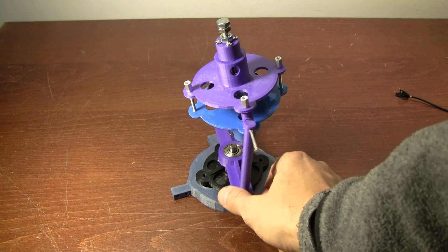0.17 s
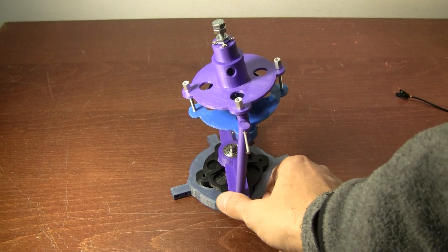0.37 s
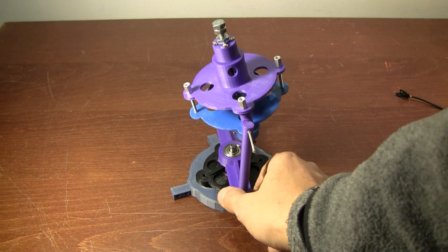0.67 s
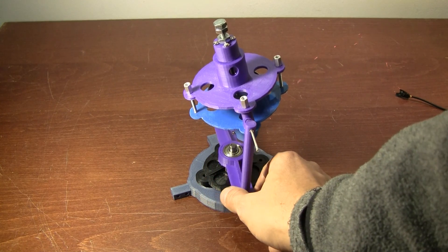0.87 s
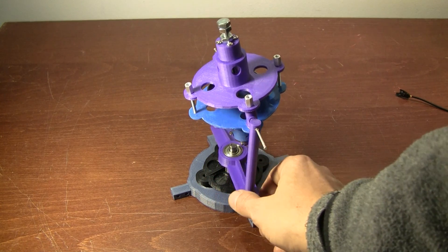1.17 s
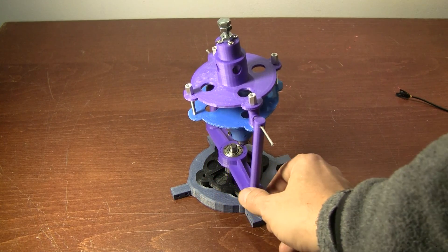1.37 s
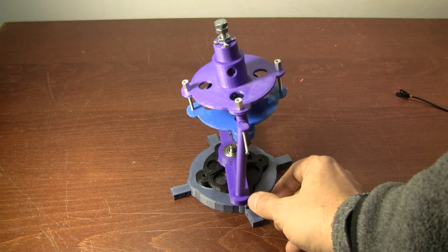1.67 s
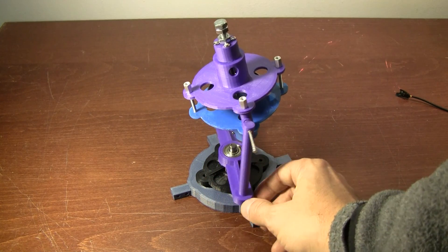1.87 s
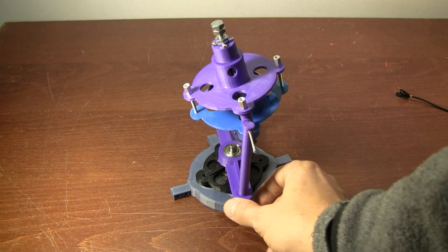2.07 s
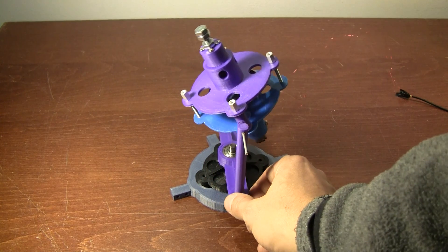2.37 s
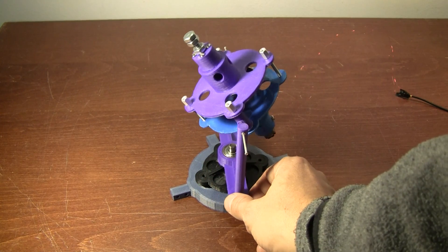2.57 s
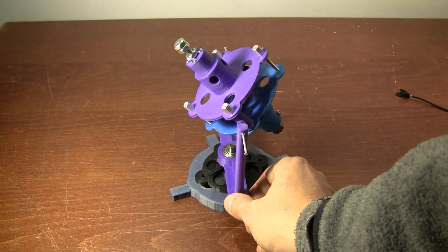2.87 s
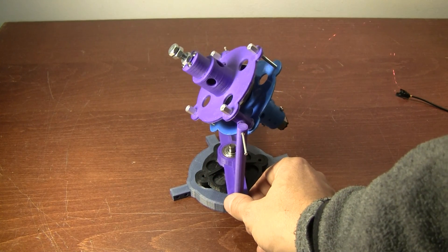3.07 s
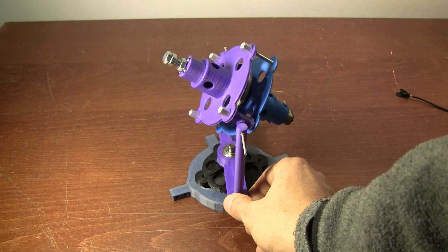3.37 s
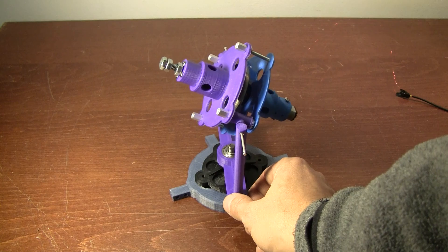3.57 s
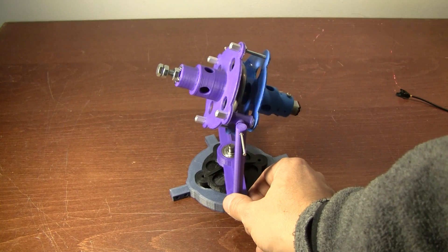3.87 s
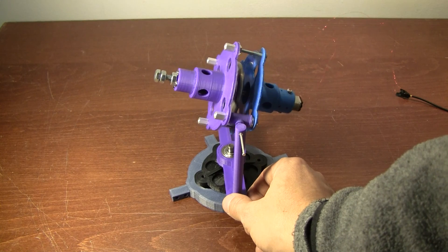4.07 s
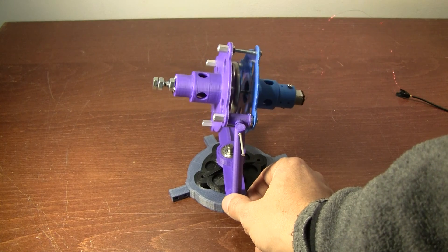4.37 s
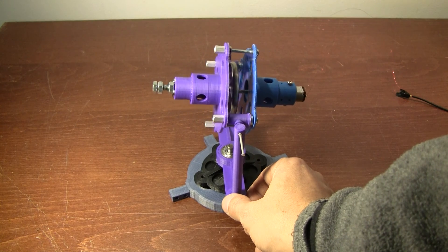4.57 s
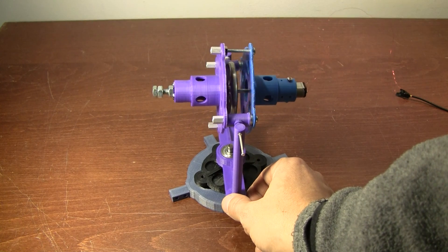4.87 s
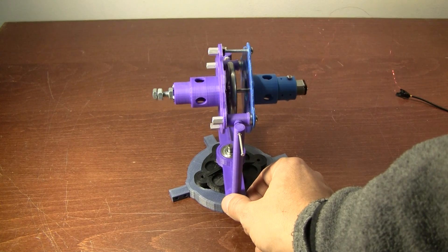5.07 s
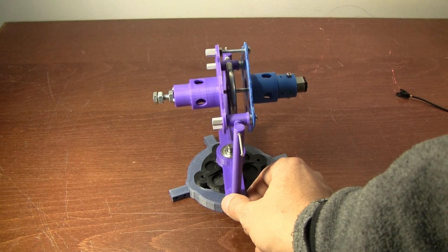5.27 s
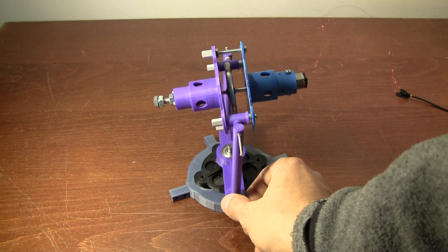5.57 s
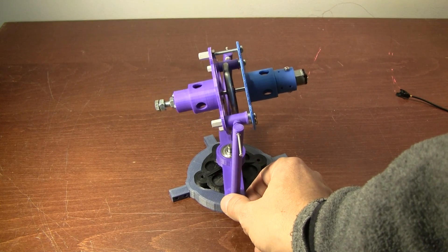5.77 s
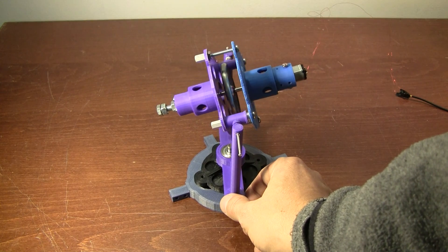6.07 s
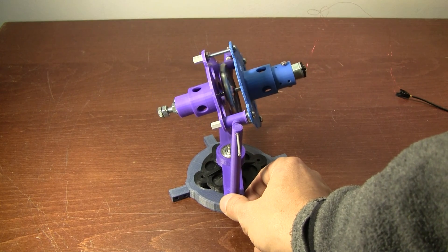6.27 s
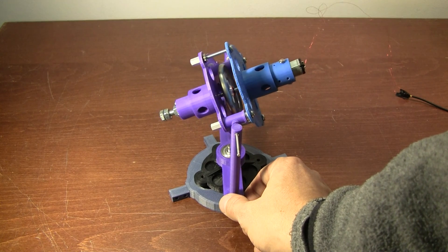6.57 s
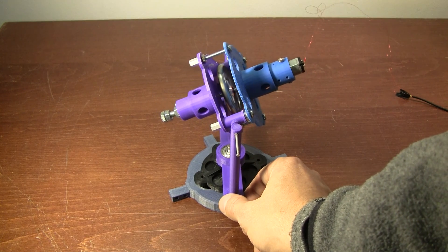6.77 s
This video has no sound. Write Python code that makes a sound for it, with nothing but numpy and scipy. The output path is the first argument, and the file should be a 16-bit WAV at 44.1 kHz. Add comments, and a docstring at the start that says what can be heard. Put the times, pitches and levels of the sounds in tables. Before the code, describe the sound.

A motor-driven gyroscope whirrs at constant speed on a wooden table, close to a stereo microphone. Dense, bright bearing rush covers fluttering whines and a low hum. The hum dips four times as the base turns, then jumps when the frame tips. The rush thins, whines become steadier, and a faint high hiss slides downward late on.

```python
"""A motor-driven gyroscope spins at constant speed in a plastic gimbal on a wooden table.
At first it is nearly upright: its ball bearings rush, shaped by the resonances of the frame, its unbalance hums,
and whining tones at multiples of the rotor speed, with cage sidebands, swell, some alone, some together.
The hum dips in an even run while the base is turned; then a hand tilts the frame, and rush and whine change colour.
Past the horizontal a thin hiss slides down in pitch, and the rotor whirls briefly in low tones."""
import sys
import numpy as np
from scipy import signal
from scipy.fft import rfft, irfft
from scipy.io import wavfile

SR = 44100
rng = np.random.default_rng(int(sys.argv[2]) if len(sys.argv) > 2 else 0)


def master_out(mix):
    """Clip the mix to full scale and print it as 16-bit PCM to the path in sys.argv[1]."""
    frames = np.transpose(np.atleast_2d(mix))
    ceiling = np.clip(frames, -1, 1)
    pcm = np.round(ceiling * 32767).astype(np.int16)
    wavfile.write(sys.argv[1], SR, pcm)


N = 305613
CONTROL_STEP = 100  # samples between two values of a slow control
ROTOR_HZ, CAGE_HZ = 311.38, 119.93  # turns per second of the rotor and of the cage that holds the balls

# how alike the left and right sides are: f/Hz, likeness (1 = the same on both sides)
LIKENESS = [(60, .7), (130, 0.53), (290, 0.9), (640, 0.85), (1400, 1), (3100, 1), (5500, 1), (7000, 0.83),
            (10000, 0.52), (15000, .55)]


def from_db(db):
    """Turn decibels into a factor for the amplitude."""
    return 10 ** (np.asarray(db) / 20)


def rms_one(x):
    """Scale a signal to an rms of 1."""
    return x / np.sqrt(np.mean(x ** 2) + 1e-20)


def seconds():
    """Time of every sample."""
    return np.arange(N) / SR


def ticks():
    """Times of the slow controls."""
    return np.arange(N // CONTROL_STEP + 2) * CONTROL_STEP / SR


def per_sample(control):
    """Fill in a slow control, sample by sample."""
    return np.interp(seconds(), ticks(), control)


def bin_hz():
    """Frequency of every bin of the spectrum, at least 1 Hz so that its logarithm exists."""
    return np.maximum(np.arange(N // 2 + 1) * SR / N, 1)


def in_time(rows):
    """Turn each column of a table over time into a slow control."""
    times, *columns = np.transpose(rows)
    return [np.interp(ticks(), times, column) for column in columns]


def at_hz(points, hz):
    """Read each column of a spectrum table on a log-frequency axis."""
    table_hz, *columns = np.transpose(points)
    return np.array([np.interp(np.log(hz), np.log(table_hz), column) for column in columns])


def drift(rate):
    """Slow random control with an rms of 1: noise smoothed by two equal poles at the rate in Hz."""
    pole = np.exp(-2 * np.pi * rate * CONTROL_STEP / SR)
    settling = 2000  # values dropped while the filter settles
    noise = rng.standard_normal(len(ticks()) + settling)
    return rms_one(signal.lfilter([1], [1, -2 * pole, pole * pole], noise)[settling:])


def skidding(share, rate):
    """Complex strength of a tone, mean power 1: a steady part and a part that flutters in level and phase."""
    share = np.clip(share, 0, 1)
    flutter = drift(rate) + 1j * drift(rate)
    return np.sqrt(1 - share) + np.sqrt(share / 2) * flutter


def sides(hz):
    """Left and right gains of the microphone pair, with their mean power kept at 1."""
    # f/Hz, left minus right level/dB
    balance = [(100, -1.5), (380, 2.6), (700, 2.5), (1300, .5), (4400, 0.1), (8100, 0.5), (10000, -3),
               (12500, 5.5), (15000, 1.5)]
    pair = from_db(at_hz(balance, np.atleast_1d(hz)) * [[.5], [-.5]])
    return pair / np.sqrt(np.mean(pair ** 2, axis=0))


def partial(hz, strength):
    """A tone whose complex strength sets its rms and phase; where the sides are less alike, their phases part."""
    wave = per_sample(strength) * np.exp(2j * np.pi * (hz * seconds() + rng.random()))
    alike = np.clip(at_hz(LIKENESS, hz)[0], 0, 1)
    shared = np.sqrt(1 + alike) * wave.imag
    opposed = np.sqrt(1 - alike) * wave.real * [[1], [-1]]
    return sides(hz) * (shared + opposed)


def reflections(echo_db, t60):
    """Direct sound plus a short tail from table and wall: a fine ripple over the spectrum, mean power 1."""
    # the tail falls by 60 dB in t60 seconds, down to a floor at -120 dB
    tail = rng.standard_normal(N) * from_db(-60 * np.minimum(seconds() / t60, 2))
    response = 1 + from_db(echo_db) * rfft(tail) / np.linalg.norm(tail)
    return response / np.sqrt(1 + from_db(echo_db) ** 2)


def sliding_hiss():
    """As the frame passes the horizontal, a narrow band of bearing hiss swells, slides down and fades."""
    start_s, length_s, peak_db = 4.6, 2.8, -46
    start_hz, sag_hz_per_s, half_width_hz = 13050, 400, 160
    age = seconds() - start_s
    swell = np.sin(np.pi * np.clip(age / length_s, 0, 1))
    carrier = np.exp(2j * np.pi * np.cumsum(start_hz - sag_hz_per_s * age) / SR)
    lowpass = signal.butter(2, half_width_hz, fs=SR, output="sos")
    blur = signal.sosfilt(lowpass, rng.standard_normal((2, N)))
    # slow noise times the carrier gives a noise band around the sliding pitch
    band = rms_one(((blur[0] + 1j * blur[1]) * carrier).real)
    return from_db(peak_db) * swell * sides(start_hz) * band


def whirl(unrest):
    """In its bearing play the shaft orbits just under half speed; mixed with the rotation: two pairs of low tones."""
    # t/s, lower pair level/dB, upper pair level/dB
    whirl_levels = [(5.39, -85, -85), (5.46, -53, -62), (5.58, -55, -61), (5.7, -56, -52), (5.92, -58, -58),
                    (6.05, -83, -85)]
    orbit_hz = 142.3
    out = 0
    for hz in (orbit_hz, ROTOR_HZ - orbit_hz):
        # the upper pair lies one rotor frequency above the lower pair
        for turns, level_db in enumerate(in_time(whirl_levels)):
            strength = from_db(level_db) * skidding(unrest, rate=6)
            out = out + partial(hz + turns * ROTOR_HZ, strength)
    return out


def hum_dips(count):
    """While the base is turned, the hum dips in an even run, each dip shallower than the last (in dB)."""
    first_s, every_s, length_s = 1.64, 0.176, 0.047  # middle of the first dip, spacing, length
    first_db, kept_share = -16, 0.73
    dips = 0
    for k in range(count):
        since_middle = ticks() - first_s - k * every_s
        dips = dips + first_db * kept_share ** k * np.exp(-(2 * since_middle / length_s) ** 2)
    return dips


def hum(waver_db, waver_rate):
    """The unbalance shakes the table once a turn; its hum wavers slightly in level."""
    # jumps as the frame starts to tip, eases as it lies down: t/s, level before waver and dips/dB
    unbalance = [(0.06, -47), (2.27, -49), (2.33, -41), (3.18, -39), (5.6, -46.5), (5.62, -49.5),
                 (6.9, -49.5)]
    level_db, = in_time(unbalance)
    waver = waver_db * from_db(level_db.min() - level_db) * drift(waver_rate)
    return partial(ROTOR_HZ, from_db(level_db + waver + hum_dips(count=4)))


def sung_power(rotor, cage):
    """Power that one tone gains when it sings out in the frame: each swell rises, holds and fades."""
    # start t/s, length/s, rotor multiple, cage multiple, level before trim/dB
    singing = [(0.65, 1.64, 12, 0, -34.5), (0.9, 0.7, 30, 0, -39), (1.3, 2.1, 17, 0, -44.5),
               (2.24, 0.46, 34, 0, -37), (2.24, 0.33, 33, 0, -38), (2.24, 0.38, 39, 0, -45),
               (2.28, 0.28, 13, 0, -36.5), (2.32, 0.3, 15, 1, -35.5), (2.35, 1.5, 41, 0, -39.5),
               (2.676, 0.82, 5, 0, -42), (3.0, 3.06, 15, 1, -39), (3.55, 1.1, 34, 0, -43),
               (3.55, 1.2, 31, 0, -46), (3.65, 2, 13, -1, -38.5), (5.4, 2.9, 12, 1, -35),
               (5.6, 2.2, 13, -2, -39), (5.85, 1.3, 39, 0, -44), (5.9, 0.49, 11, 0, -37),
               (6.5, 0.6, 13, -1, -39)]
    trim_db, attack_share, release_share = 0.3, 0.14, 0.33  # shares of the length of a swell
    power = 0
    for start, length, rotor_order, cage_order, db in singing:
        if (round(rotor_order), round(cage_order)) == (rotor, cage):
            age = (ticks() - start) / length
            swell = np.clip(np.minimum(age / attack_share, (1 - age) / release_share), 0, 1)
            power = power + (swell * from_db(db + trim_db)) ** 2
    return power


def whine(side_load, loose_share, loaded_share, skid_rate, swell_share, swell_rate):
    """Rotor multiples and cage sidebands; upright the balls skid and blur them, side load makes them roll true."""
    # rotor multiple, level under end load before trim/dB, level under side load before trim/dB
    rotor_orders = [(2, -59, -58.5), (3, -47.5, -48), (4, -52, -50.5), (5, -44.5, -48), (6, -52, -51.5),
                    (7, -40.5, -58), (8, -38, -46.5), (9, -41, -53), (10, -54, -46.5), (11, -46, -43),
                    (12, -36.5, -43.5), (13, -42, -43.5), (14, -61, -52), (15, -59, -44), (16, -54, -54),
                    (17, -45, -48.5), (18, -56, -59), (19, -63, -50), (20, -62, -53), (21, -60, -54),
                    (22, -52, -60), (23, -48, -52), (24, -52, -47.5), (25, -48, -50), (28, -61, -69),
                    (29, -64, -64), (30, -59, -51), (31, -54, -54), (32, -60, -51), (33, -55, -52),
                    (34, -64, -45.5), (35, -59, -47), (36, -65, -58), (37, -60, -51), (38, -64, -58),
                    (39, -61, -52), (40, -60, -46.5), (41, -58, -52), (42, -61, -56), (43, -60, -60),
                    (44, -60, -56), (45, -65, -56), (46, -65, -56)]
    # rotor multiple, cage multiple, level under end load before trim/dB, level under side load before trim/dB
    sidebands = [(0, 1, -69.5, -71.5), (1, -1, -65, -60.5), (3, 1, -44.5, -51), (5, 1, -62, -51.5),
                 (8, 1, -43, -58), (11, 1, -42, -56), (12, -1, -52, -45), (11, 2, -57, -56),
                 (13, -2, -54, -57), (12, 1, -50, -61), (13, -1, -48, -43), (14, -1, -51, -51),
                 (16, -2, -54, -49.5), (15, 1, -41.5, -41.5)]
    trim_db = 0.6
    skid = loose_share + (loaded_share - loose_share) * side_load
    tones = [(rotor, 0, end_db, side_db) for rotor, end_db, side_db in rotor_orders] + list(sidebands)
    out = 0
    for rotor, cage, end_db, side_db in tones:
        rotor, cage = round(rotor), round(cage)
        steady = from_db(end_db + trim_db) * (1 - side_load) + from_db(side_db + trim_db) * side_load
        strength = steady * skidding(skid, skid_rate)
        # at resonance the frame answers a quarter cycle late, and more evenly
        sung = np.sqrt(sung_power(rotor, cage)) * skidding(swell_share * skid, swell_rate)
        out = out + partial(rotor * ROTOR_HZ + cage * CAGE_HZ, strength - 1j * sung)
    return out


def rasp():
    """Gain of the rolling noise as the bearings rasp briefly while the frame is moved."""
    # middle t/s, length/s, extra level/dB
    rasps = [(1.217, .03, 1.3), (2.355, 0.024, 2), (2.44, 0.091, 0.8)]
    return from_db(sum(db * np.exp(-(2 * (seconds() - middle) / length) ** 2) for middle, length, db in rasps))


def rolling_contact(throb, flutter_db):
    """Stereo spectrum of balls on rough races: noise that throbs as the inner race overtakes the cage."""
    overtaking = 2 * np.pi * (ROTOR_HZ - CAGE_HZ) * seconds()
    turning = 2 * np.pi * ROTOR_HZ * seconds()
    load = 1 + throb * (np.cos(overtaking) + np.cos(2 * overtaking) + np.cos(turning))
    flutter = from_db(flutter_db * per_sample(drift(17)))
    mid, side = rfft(rng.standard_normal((2, N)) * load * flutter)
    alike = np.clip(at_hz(LIKENESS, bin_hz()), 0, .994)
    stereo = np.sqrt(1 + alike) * mid + np.sqrt(1 - alike) * side * [[1], [-1]]
    return stereo * sides(bin_hz())


def band_rms(spectrum, low_hz, high_hz):
    """Level of one band of a stereo spectrum, both sides mixed."""
    inside = (bin_hz() > low_hz) & (bin_hz() < high_hz)
    return np.sqrt(2 * np.sum(abs(spectrum.mean(axis=0)[inside]) ** 2)) / N


def bearing_rush(lying):
    """The frame radiates the rolling noise; tilting turns other resonances towards the microphone."""
    # levels of the rolling noise: t/s, frame rush before trim/dB, ball hiss before trim/dB
    rolling = [(0.1, -24, -29.5), (0.76, -24.5, -29.5), (1.12, -24.5, -27.5), (2.2, -23.5, -29.5),
               (2.31, -24.5, -29.5), (2.79, -25.5, -30.5), (4.1, -28, -28.5), (5.31, -30, -31.5),
               (6.9, -28, -30)]
    # broad colour of the rolling noise: f/Hz, relative level upright/dB, relative level on its side/dB
    rush_colour = [(30, -50.5, -48.5), (70, -34.5, -38), (120, -33, -31.5), (193, -20.5, -21.5),
                   (420, -22, -21.5), (850, -13, -14), (1070, -7, -15), (3040, -1, -11.5), (4200, 0, -9),
                   (5870, -16, -19.5), (10540, -11, -12.5), (13000, -17.5, -16), (15500, -28.5, -33)]
    # resonances (+) and notches (-) of the frame: f/Hz, width/Hz, change upright/dB, change on its side/dB
    frame = [(482, 34, 7, 5), (657, 57, 3, 1.5), (907, 88, -7.2, -11), (953, 11, 6.5, 3),
             (1086, 31, -3.5, -7), (1188, 15, 6, 3), (1290, 37, 2, -8.5), (1370, 174, 0.5, 7.5),
             (1498, 44, -8, 4.5), (1661, 47, -8.5, 0.5), (1916, 350, -5.5, 4.5), (2110, 86, -4.5, -1),
             (2350, 178, 0.1, 3), (2650, 58, -6.5, -2), (3040, 53, -0.2, 8), (3080, 109, 1.2, -3.5),
             (3580, 840, -3.5, 5), (3870, 56, -2, 2.5), (3960, 130, -3.5, 1.5), (4290, 540, -7.5, -1.5),
             (4870, 80, 2, 4.5), (6670, 1530, 3.5, 7), (7810, 330, 6, 4.5), (11380, 499, -4, -2.5),
             (14384, 741, 3, 3), (15433, 877, 1, 10)]
    rush_trim_db, hiss_trim_db, hiss_from_hz = -0.56, -1.25, 6500

    hz, contact = bin_hz(), rolling_contact(throb=.04, flutter_db=0.45)
    colours = at_hz(rush_colour, hz)
    for centre, width, *posture_db in frame:
        bump = 1 / (1 + (2 * (hz - centre) / width) ** 2)
        colours = colours + np.outer(posture_db, bump)

    rush_db, hiss_db = in_time(rolling)
    treble = 1 / (1 + (hiss_from_hz / hz) ** 8)
    out = 0
    for colour, share in zip(colours, (1 - lying, lying)):
        sound = contact * from_db(colour) * reflections(echo_db=-16, t60=0.059)
        # each part is scaled by the level of its main band
        rush = irfft(sound * (1 - treble), N) / band_rms(sound, 900, 3600)
        hiss = irfft(sound * treble, N) / band_rms(sound, 5500, 15000)
        out = out + per_sample(share * from_db(rush_db + rush_trim_db)) * rush
        out = out + per_sample(share * from_db(hiss_db + hiss_trim_db)) * hiss
    return out


def scene():
    """Rush, whine, hum and whirl of the rotor as the frame tilts."""
    # t/s, share of lying on its side (0-1), side load on the bearings (0-1)
    posture = [(0, 0.1, 0.33), (2.2, 0, 0.17), (2.35, 0, 0.85), (3.0, 0.22, 0.8), (4.0, 0.53, 1),
               (4.8, 0.87, 0.95), (5.8, 1, 0.9), (6.93, 0.9, 0.97)]
    lying, side_load = np.clip(in_time(posture), 0, 1)
    tones = whine(side_load, loose_share=0.58, loaded_share=0.095, skid_rate=11.8,
                  swell_share=0.72, swell_rate=15)
    low_tones = hum(waver_db=1.5, waver_rate=8) + whirl(unrest=.06)
    return bearing_rush(lying) * rasp() + tones + low_tones + sliding_hiss()


def record(dry):
    """Cut the top steeply: a fall from full to nothing within 100 Hz around the cutoff."""
    cutoff_hz = 15720
    keep = np.clip((cutoff_hz - bin_hz()) / 100 + .5, 0, 1)
    return irfft(rfft(dry) * keep, N)


dry = scene()
out = record(dry)
master_out(out)
```